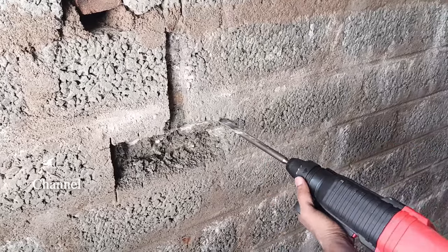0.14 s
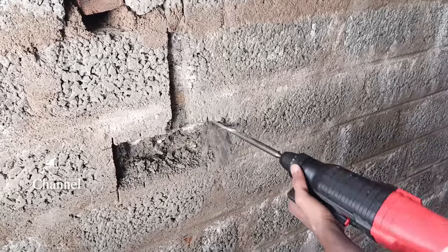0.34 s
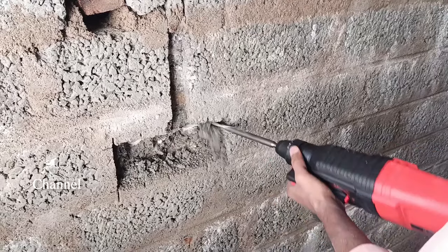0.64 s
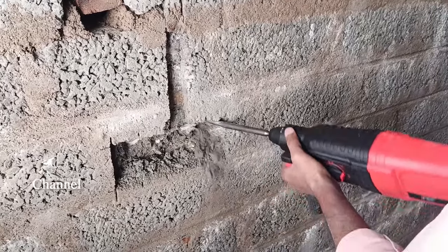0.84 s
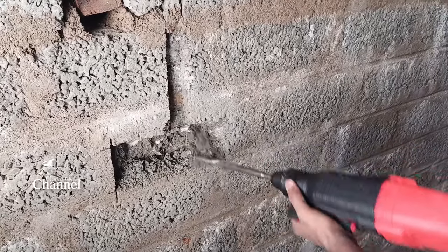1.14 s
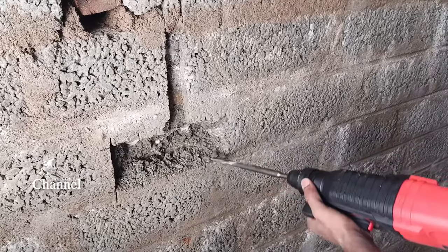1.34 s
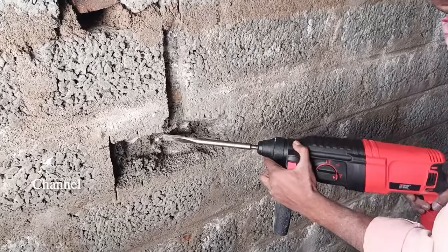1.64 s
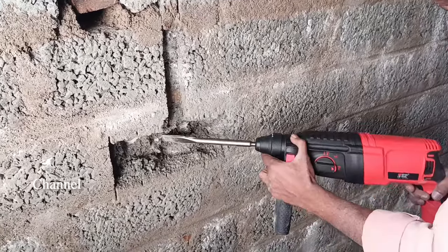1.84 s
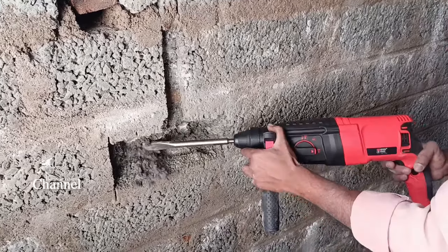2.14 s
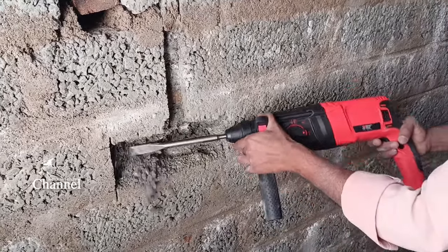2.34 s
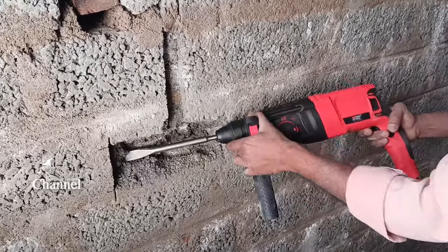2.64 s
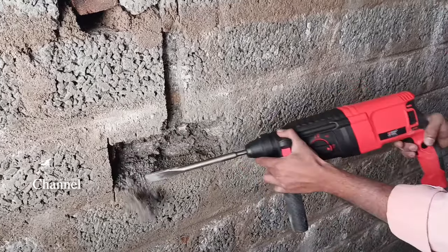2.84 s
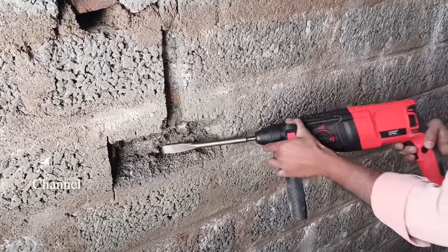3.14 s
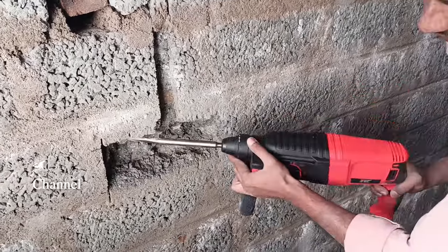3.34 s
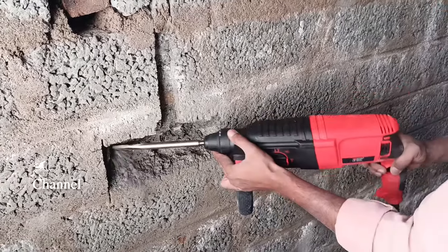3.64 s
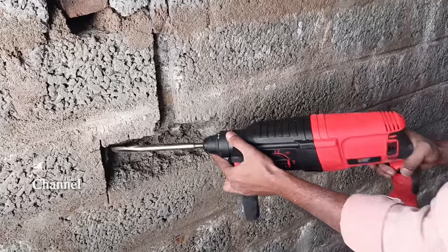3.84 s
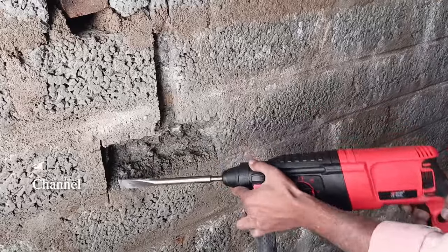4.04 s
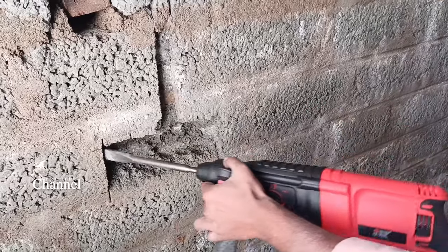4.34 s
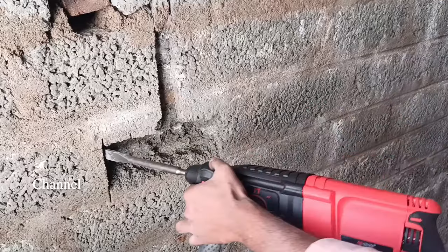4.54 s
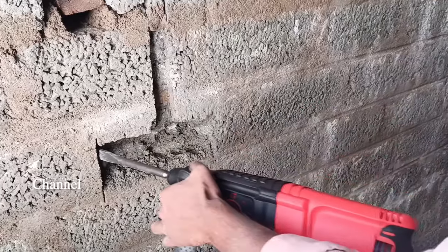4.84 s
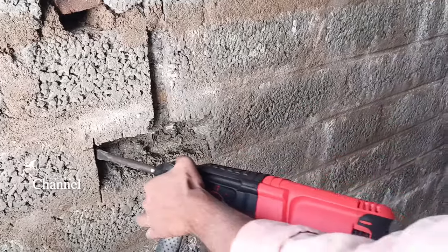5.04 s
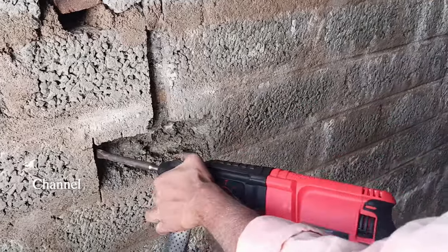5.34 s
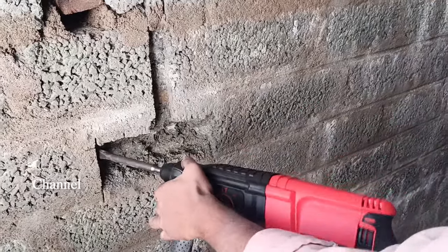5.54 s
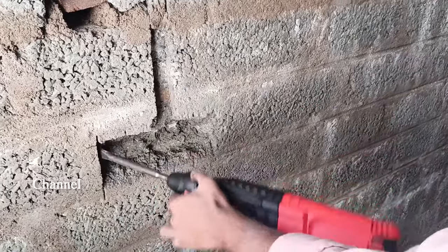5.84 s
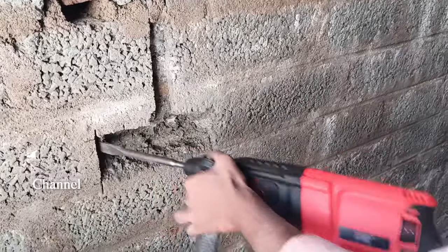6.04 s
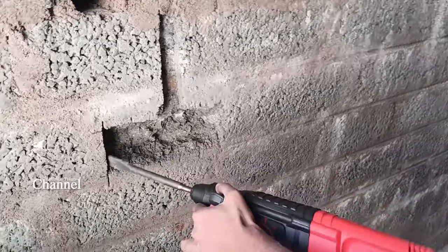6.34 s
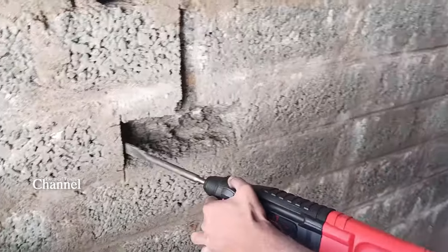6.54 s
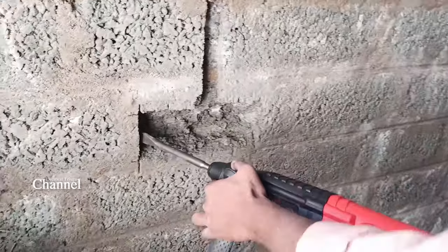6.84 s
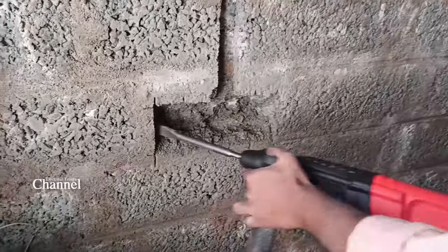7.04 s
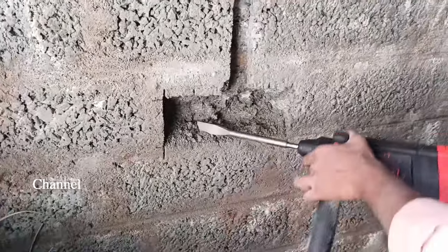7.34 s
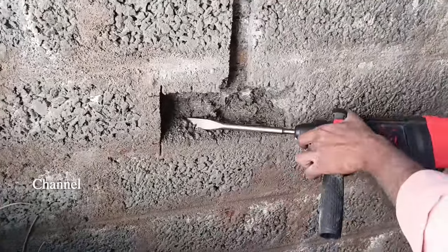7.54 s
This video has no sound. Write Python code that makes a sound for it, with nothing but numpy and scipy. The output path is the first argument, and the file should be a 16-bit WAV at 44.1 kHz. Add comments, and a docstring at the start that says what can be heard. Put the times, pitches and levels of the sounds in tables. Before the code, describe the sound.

Close, harsh power-chisel chatter on a block wall: whirring gears, crunching grit and hollow booms, with two abrupt cuts and several run-downs.

```python
"""A rotary hammer chips a concrete block wall, heard from close by in three stretches of work.
Its piston strikes about 65 times a second; each blow shakes gear noise and ringing out of the housing.
When the chisel bites, bursts of noise crack like grit, and tuned resonances ring as steel, block and wall.
Lumps of low noise buffet the two microphone ports as puffs of air and dust. Narrow pitches stand out at
moments, short bright taps come from the chisel, and a rough tone climbs briefly after each of two cuts."""
import sys
import numpy as np
from scipy import signal
from scipy.fft import rfft, irfft, next_fast_len
from scipy.io import wavfile
from scipy.ndimage import uniform_filter1d

SR = 44100
rng = np.random.default_rng(int(sys.argv[2]) if len(sys.argv) > 2 else 0)


def output_pcm(signal):
    """Save a mono or channel-first signal as 16-bit PCM at the path in sys.argv[1].

    Samples are clipped to [-1, 1] before scaling.
    """
    pcm = np.clip(np.atleast_2d(signal).T, -1, 1) * 32767
    wavfile.write(sys.argv[1], SR, np.round(pcm).astype(np.int16))


N = 339570  # length in samples

# Tone colour of the gear noise: pitch_hz, level_db (per Hz, relative)
HOUSING_COLOUR = [(150, -41.5), (500, -23.5), (760, -13), (1300, -5.5), (2580, 0.5), (3260, -2.5),
                  (4370, -0.5), (6000, -7), (8200, -18), (9600, -13), (13000, -31.5), (15500, -19.5)]
# Resonances of the housing shell: pitch_hz, level_db (relative)
SHELL_MODES = [(1320, -5), (1620, -3), (1900, -1.5), (2090, 1), (2350, -3), (2570, 1.5), (2750, -1),
               (3600, -2.5), (3950, 1), (4400, 0), (4800, -21), (5250, -8)]
# Resonances of the steel chisel: pitch_hz, level_db (relative)
CHISEL_MODES = [(9360, -3), (10070, -9), (12800, -12), (13040, 0), (13260, -7)]
# Resonances of the concrete block: pitch_hz, level_db (relative)
BLOCK_MODES = [(630, 13.5), (706, 22.5), (789, 21), (948, 13), (1190, 15)]
# Low resonances of the wall: pitch_hz, level_db (relative)
WALL_MODES = [(125, -17), (200, -11.5), (250, -6.5), (335, -11.5), (480, -9)]
# Tone colour of the cracking grit: pitch_hz, level_db (per Hz, relative)
GRIT_COLOUR = [(70, -40), (150, -5.5), (1500, -3), (4000, -1.5), (6500, 2), (8300, -11.5), (10000, 0.5),
               (11700, -8), (13500, -3), (15500, 7)]
# Tilt between the ports, used in part on the left and reversed on the right: pitch_hz, tilt_db
PORT_TILT = [(60, -7), (130, 3.5), (290, 0), (640, 4), (1410, 11), (3100, 2.5), (6820, -0.5), (15000, -1)]
# Puffs of air on the microphone ports: start_s, level_db (relative)
PUFFS = [(1.089, -26.5), (1.135, -36.5), (1.98, -28), (2.05, -26), (2.095, -27), (2.155, -33), (2.205, -32),
         (2.256, -28), (2.45, -30.5), (2.555, -40), (2.686, -33.5), (3.553, -42), (3.605, -29),
         (3.751, -27), (3.83, -39), (3.871, -28.5), (3.905, -26.5), (4.91, -37), (6.921, -42)]
# Moments when one narrow pitch stands out, a ringing resonance, a blow harmonic or a knock:
# start_s, length_s, pitch_hz, level_db
NARROW_PITCHES = [(0.003, 0.34, 2000, -36), (0.23, 0.12, 139, -48.5), (0.317, 0.2, 5780, -25.5),
                  (0.44, 0.34, 119, -50), (0.47, 0.32, 183, -45), (0.504, 0.36, 5780, -25.5),
                  (0.799, 0.34, 5730, -26.5), (0.56, 0.41, 790, -41), (0.82, 0.37, 787, -29.5),
                  (0.94, 0.13, 1185, -31), (1.057, 0.13, 7110, -26), (1.17, 0.28, 2618, -19),
                  (1.83, 0.12, 787, -37.5), (2.72, 0.13, 4430, -24), (2.786, 0.099, 5730, -26),
                  (3.247, 0.042, 280, -34), (3.332, 0.2, 3700, -23.5), (3.35, 0.092, 1010, -48),
                  (3.41, 0.066, 780, -46), (3.39, 0.15, 5440, -25), (3.533, 0.5, 5650, -27.5),
                  (3.951, 0.15, 265, -42.5), (4.664, 0.079, 1180, -31), (4.664, 0.18, 1890, -28.5),
                  (4.695, 0.1, 3910, -25), (4.718, 0.12, 5240, -27), (4.673, 0.13, 2630, -26.5),
                  (5.13, 0.27, 1175, -32.5), (5.34, 0.12, 901.5, -26.5), (5.946, 0.24, 4370, -23.5),
                  (5.998, 0.26, 2515, -25), (6, 0.15, 226, -42), (6.93, 0.055, 807, -25),
                  (7.044, 0.22, 224, -45), (7.047, 0.49, 722, -36.5), (7.117, 0.13, 5250, -26),
                  (7.05, 0.16, 4030, -26.5), (7.092, 0.35, 2380, -28)]
# Cuts: the sound is cut off and the next stretch begins, the tool already running: cut_s
CUTS_S = [1.603, 3.275]
# The trigger is held: start_s, end_s, sag_per_s (target speed lost at full load, in blows per s)
TRIGGER_PULLS = [(0, 1.35, 25), (1.62, 2.88, 17), (3.28, 3.93, 16), (4.61, 5.6, 19), (5.8, 6.13, 0),
                 (6.6, 7.27, 8)]
# The chisel bites: start_s, end_s, then level lists spread evenly over the bite:
# grit_db, steel_db, block_boom_db, wall_thud_db, housing_change_db (below 0 is damped)
BITES = [(0.27, 1.171, (-17, -22.5, -27, -24), (-29, -29, -30.5, -26, -27), (-56, -25, -34, -29),
         (-58, -43, -42, -46), (-0.5, -4.5, -1, 0.5)), (1.881, 2.758, (-16.5, -13, -13, -28),
         (-31, -30, -32, -61), (-31.5, -37, -22.5, -29), (-53, -50, -47, -48), (4.5, -1, 0, -1, -1, -8.5)),
         (3.504, 3.976, (-27, -22, -9), (-23, -28.5, -26.5), (-59, -27, -36), (-50, -36, -40),
         (-1.5, -0.57, 4.2)), (4.499, 4.676, (-46, -38, -47), (-62,), (-72,), (-79,), (-3,)),
         (4.762, 5.489, (-25.5, -13, -23, -27), (-34, -36, -35, -44), (-48, -34, -46, -27),
         (-38, -59, -40, -38.5), (-3.5, 3.5, -0.1, 2)), (6.744, 6.861, (-15, -31), (-60,), (-59, -42),
         (-39, -71), (-0.78, -9)), (6.871, 7.061, (-13.5, -31.5), (-58,), (-25.5, -20.5), (-41, -49),
         (-1.7, -1.3))]
# Short bright taps of the chisel as it slows and as it picks up speed again:
# start_s, level_db (relative)
TAPS = [(4.529, -43), (4.561, -37.5), (4.593, -44), (4.789, -37), (4.806, -40), (4.82, -35), (4.834, -29)]
# Resonances of the steel in each tap: pitch_hz, level_db (relative)
TAP_MODES = [(10400, -0.5), (11710, -7), (14900, 1), (7260, -5)]

# Motor speed in blows per second; spin-up and coasting times in seconds
START_PER_S, FREE_PER_S, SPIN_UP_S, COAST_S = 54, 78, 0.18, 0.87
REFERENCE_PER_S = 66
LOAD_EASES = 0.66  # share of the load gone by the end of a bite
HOUSING_DB, DB_PER_BLOW_PER_S = -24.5, 0.0556  # level at reference speed; louder when faster
LOOSE_REST, BITING_REST = 0.9, 1.6  # gear noise between strokes: clearer gaps with a loose chisel
SHELL_WIDTH_HZ, PATCHY_DB = 60, 3.4  # width of shell resonances; largest swing of each noise band
IDLE_BOOM_DB, IDLE_THUD_DB = -42.5, -59  # what block and wall pick up, at reference speed
LOOSE_WIDTH, BITING_WIDTH = 0.04, 0.03  # width of a narrow pitch as its share, before 25 Hz is added
BITE_IN_S, BITE_OUT_S, EDGE_DB = 0.08, 0.044, 16  # each bite swells and fades by EDGE_DB
BITE_SPREAD_DB = 4  # extra unevenness of the blows that ring the chisel steel and crack the grit
PUFF_S, PUFF_PAN_DB = 0.019, -2.5  # time scale of a puff; left minus right
RUMBLE_DB = -30.5  # dust stream on the ports, relative to the grit's level
REFILL_DB, REFILL_S = 9.5, 0.074  # quieter start after a cut; recovery time
CYCLES_PER_BLOW, CLIMB_DB = 8.1, -35  # pitch of the climbing tone; its level setting
TAP_DECAY_S, TAP_WIDTH_HZ = 0.0034, 310
LEFT_LAG_S = 0.000862
CUTOFF_HZ = 16100


def from_db(db):
    """Turn decibels into a multiplier."""
    return 10 ** (np.asarray(db) / 20)


def rms_one(x):
    """Scale a sound to an average strength of one."""
    return x / np.sqrt(np.mean(x ** 2) + 1e-20)


def in_time(values, step_s):
    """Stretch evenly spaced values over every sample."""
    return np.interp(np.arange(N) / SR, step_s * np.arange(len(values)), values)


def colour(x, points, factor=1):
    """Change the tone with a dB curve over pitch, spaced as the ear hears it."""
    size = next_fast_len(N + 8192)
    hz, db = np.transpose(points)
    bins_hz = np.arange(size // 2 + 1) * SR / size
    curve_db = np.interp(np.log(bins_hz + 1), np.log(hz), db)
    return irfft(rfft(x, size) * from_db(factor * curve_db), size)[..., :N]


def drift(rate_hz):
    """Slow random wandering around zero with a spread of one."""
    r = np.exp(-80 * np.pi * rate_hz / SR)  # one value per 40 samples
    noise = rng.standard_normal(N // 40 + 2002)
    slow = signal.lfilter([1], [1, -2 * r, r * r], noise)[2000:]
    return np.interp(np.arange(N) / 40, np.arange(len(slow)), rms_one(slow))


def stereo_noise(alike, size=N):
    """White noise, a share of it common to both ports."""
    common, left, right = rng.standard_normal((3, size))
    alike = np.clip(alike, 0, 1)
    return np.sqrt(alike) * common + np.sqrt(1 - alike) * np.array([left, right])


def resonate(x, hz, width_hz):
    """Let one pitch ring; a narrow width rings longer."""
    r = np.exp(-np.pi * width_hz / SR)
    return signal.lfilter([1, 0, -1], [1, -2 * r * np.cos(2 * np.pi * hz / SR), r * r], x + 1e-18)


def motor(step_s=0.005):
    """Speed spins up under power, sags while the chisel bites and coasts down off the trigger."""
    speed = [START_PER_S]
    for s in np.arange(0, N / SR, step_s):
        load = sum(1 - LOAD_EASES * (s - start) / (end - start)
                   for start, end, *levels in BITES if start + BITE_IN_S < s < end)
        goals = [FREE_PER_S - sag * load for on, off, sag in TRIGGER_PULLS if on <= s < off]
        pull = (goals[0] - speed[-1]) / SPIN_UP_S if goals else -speed[-1] / COAST_S
        # each later stretch begins at the starting speed
        new_stretch = any(0 <= s - cut < step_s for cut in CUTS_S)
        speed.append(START_PER_S if new_stretch else speed[-1] + step_s * pull)
    return in_time(speed, step_s)


def blows(per_s, jitter_s, spread_db):
    """Sample index and strength of each piston blow; slow blows are weaker."""
    at = np.flatnonzero(np.diff(np.floor(np.cumsum(per_s) / SR)))
    chance = rng.standard_normal((len(at), 2))
    shift = (chance[:, 0] * jitter_s * SR).astype(int)
    strength = per_s[at] / REFERENCE_PER_S * from_db(spread_db * chance[:, 1])
    return np.clip(at + shift, 0, N - 1), strength


def after_blows(at, strength, decay_s, rest, rise_s):
    """Loudness that swells at each blow and dies away to a resting level."""
    clicks = np.zeros(N)
    clicks[at] = strength
    rise = np.exp(-1 / (rise_s * SR))
    fall = np.exp(-1 / (decay_s * SR))
    return rest + signal.lfilter([1 - rise], np.convolve([1, -rise], [1, -fall]), clicks)


def strokes(at, strength, cluster_s, alike):
    """A stroke is a cluster of contacts repeated at every blow; three patterns blend slowly."""
    clicks, out = np.zeros((1, N)), 0
    clicks[0, at] = strength
    window = np.exp(-0.5 * (np.arange(-400, 400) / (cluster_s * SR)) ** 2)
    blend = np.array([drift(2.67) for k in range(3)])
    for share in blend / np.linalg.norm(blend, axis=0):
        pattern = window * stereo_noise(alike, size=800)
        out = out + share * signal.oaconvolve(clicks, pattern, axes=1)[:, 400:N + 400]
    return rms_one(out)


def struck(modes, push, width_hz, wander_db, waver_s=0):
    """The push rings every resonance; the grip slowly shifts levels and, with waver_s, pitches."""
    out = 0
    for hz, level_db in modes:
        # the second pass steepens the sides of the resonance
        ring = rms_one(resonate(resonate(push, hz, width_hz), hz, 3 * width_hz))
        read = np.arange(N) + waver_s * SR * drift(4.0)
        gain = from_db(level_db + wander_db * np.tanh(drift(6.3)))
        out = out + gain * [np.interp(read, np.arange(N), side) for side in ring]
    return rms_one(out)


def housing(at, strength, push, per_s, depth):
    """Gear and brush noise swells with strokes, patchy by band, brighter at speed; the shell rings."""
    rest_level = LOOSE_REST + (BITING_REST - LOOSE_REST) * depth
    swell = after_blows(at, strength, 0.0035, rest_level, 0.001)
    swell = swell / uniform_filter1d(swell, size=3000)  # strokes change the grain, not the level
    rattle = rms_one(colour(stereo_noise(0.0076) * swell + 0.095 * push, HOUSING_COLOUR))
    pace = per_s / REFERENCE_PER_S
    out, rest = 0, rattle
    for band, edge_hz in enumerate([1100, 2000, 3300, 5500]):
        low = signal.sosfiltfilt(signal.butter(2, edge_hz, fs=SR, output="sos"), rest)
        patchy = from_db(PATCHY_DB * np.tanh(drift(7.3)))
        out = out + low * patchy * pace ** (0.5 * band)
        rest = rest - low
    shell = struck(SHELL_MODES, push, SHELL_WIDTH_HZ, wander_db=8.0, waver_s=0.0003)
    return out + rest * pace ** 0.68 + from_db(-3.5) * shell


def concrete_block(at, strength):
    """Very short blows and some noise make the block's middle resonances boom."""
    push = strokes(at, strength, 0.00031, 1.0) + 0.5 * stereo_noise(0.54)
    return struck(BLOCK_MODES, push, 66, wander_db=5.5, waver_s=0.00057)


def wall_thud(at, strength):
    """Bare blows ring the wall's low resonances and give clear harmonics."""
    clicks = np.zeros(N)
    clicks[at] = strength
    return struck(WALL_MODES, clicks + 0.03 * stereo_noise(0.6), 45, wander_db=4)


def narrow_pitches(push, depth):
    """One narrow pitch swells and fades; it is wider when higher, narrower while the chisel bites."""
    out = np.zeros((2, N))
    for s, length_s, hz, level_db in NARROW_PITCHES:
        i, n = int(s * SR), int(length_s * SR)
        width_share = LOOSE_WIDTH + (BITING_WIDTH - LOOSE_WIDTH) * depth[i + n // 2]
        width_hz = width_share * hz + 25
        drive = push[:, i:i + n] + 0.5 * stereo_noise(0.4, size=n)
        ring = resonate(resonate(drive, hz, width_hz), hz, 2 * width_hz)
        out[:, i:i + n] += from_db(level_db) * rms_one(ring) * signal.windows.tukey(n, 0.7)
    return out


def bites():
    """Gains of grit, steel, block and wall; housing change in dB; how far the chisel is in, 0-1."""
    t, gains, housing_change_db, depth = np.arange(N) / SR, np.zeros((4, N)), np.zeros(N), np.zeros(N)
    for start, end, *layers in BITES:
        i = slice(int(start * SR), int(end * SR))
        going_in = np.clip((t[i] - start) / BITE_IN_S, 0, 1)
        coming_out = np.clip((end - t[i]) / BITE_OUT_S, 0, 1)
        depth[i] = np.minimum(going_in, coming_out)
        *levels, change_db = [np.interp(t[i], np.linspace(start, end, len(db)), db) for db in layers]
        gains[:, i] += from_db(np.array(levels) - EDGE_DB * (1 - depth[i]))
        housing_change_db[i] += change_db * depth[i]
    return gains, housing_change_db, depth


def chisel_steel(at, landed):
    """Uneven blows and some noise make the high resonances of the steel ring."""
    push = strokes(at, landed, 0.0008, 0.4) + 0.5 * stereo_noise(0.4)
    return struck(CHISEL_MODES, push, 90, wander_db=5)


def grit(at, landed):
    """Grains of uneven size crack off, loudest just after a blow."""
    sizes = from_db(3.4 * np.minimum(rng.exponential(1, N), 5))
    swell = after_blows(at, landed, 0.00078, 0.23, 0.00048)
    return rms_one(colour(sizes * stereo_noise(0.2) * swell, GRIT_COLOUR))


def buffeting(cracking):
    """Puffs are lumps of low noise, nearly separate at each port; a lighter rush runs under the grit."""
    swell, age = np.zeros(N), np.arange(4000) / SR / PUFF_S
    for s, level_db in PUFFS:
        i = int(s * SR)
        swell[i:i + 4000] += from_db(level_db) * age * np.exp(1 - age ** 2)
    noise = stereo_noise(0.021)
    lows = rms_one(signal.sosfilt(signal.butter(2, [75, 200], "band", fs=SR, output="sos"), noise))
    air = rms_one(signal.sosfilt(signal.butter(2, [140, 560], "band", fs=SR, output="sos"), noise))
    pan = from_db([[PUFF_PAN_DB / 2], [-PUFF_PAN_DB / 2]])
    return pan * (swell * (lows + 0.69 * air) + from_db(RUMBLE_DB) * cracking * air)


def cuts():
    """Sound drops to silence at each cut and fills up again within a few hundredths of a second."""
    gain = 1
    for s in CUTS_S:
        age = np.maximum(np.arange(N) / SR - s, 0)
        gap = 1 - np.exp(-(age / 0.012) ** 2)
        recovery = from_db(-REFILL_DB * np.exp(-(age / REFILL_S) ** 2))
        gain = gain * np.where(age > 0, gap * recovery, 1)
    return gain


def climbing_tone(per_s):
    """A rough tone and its octave climb briefly as the sound comes back after each cut."""
    phase = 2 * np.pi * np.cumsum(CYCLES_PER_BLOW * per_s) / SR
    swell = sum(np.exp(-((np.arange(N) / SR - s - 0.19) / 0.07) ** 2) for s in CUTS_S)
    tones = 0.5 * np.sin(phase) + np.sin(2 * phase)
    return from_db(CLIMB_DB) * swell * drift(40.0) * tones


def taps():
    """Each tap is a short bright burst in the steel."""
    out, age = np.zeros((2, N)), np.arange(900) / SR
    for s, level_db in TAPS:
        i = int(s * SR)
        burst = stereo_noise(0.58, size=900) * np.exp(-age / TAP_DECAY_S)
        ring = sum(from_db(db) * rms_one(resonate(burst, hz, TAP_WIDTH_HZ)) for hz, db in TAP_MODES)
        out[:, i:i + 900] += from_db(level_db) * ring
    return out


def scene():
    """Layers of tool, block and wall are mixed, reach the two ports and meet the puffs there."""
    per_s = motor()
    (cracking, ringing, boom, thud), housing_change_db, depth = bites()
    pace_db = DB_PER_BLOW_PER_S * (per_s - REFERENCE_PER_S)
    at, strength = blows(per_s, jitter_s=0.0001, spread_db=1.2)
    landed = strength * from_db(BITE_SPREAD_DB * rng.standard_normal(len(at)))
    push = strokes(at, strength, 0.0013, 0.3) + (0.6 + 0.2 * depth) * stereo_noise(0.15)

    housing_gain = from_db(HOUSING_DB + pace_db + housing_change_db)
    mix = housing_gain * housing(at, strength, push, per_s, depth)
    mix = mix + (boom + from_db(IDLE_BOOM_DB + pace_db)) * concrete_block(at, strength)
    mix = mix + (thud + from_db(IDLE_THUD_DB + pace_db)) * wall_thud(at, strength)
    mix = mix + narrow_pitches(push, depth)
    mix = mix + ringing * chisel_steel(at, landed)
    mix = mix + from_db(3.3 * drift(9.6)) * cracking * grit(at, landed)
    left, right = mix + climbing_tone(per_s) + taps()

    left = np.interp(np.arange(N) - LEFT_LAG_S * SR, np.arange(N), left)  # the far port hears later
    at_ports = np.array([colour(left, PORT_TILT, 0.52), colour(right, PORT_TILT, -0.77)])
    return cuts() * (at_ports + buffeting(cracking))


def record(dry):
    """The microphone drops the deep bass and rounds the peaks; the top is cut."""
    dry = signal.sosfilt(signal.butter(2, 65, "high", fs=SR, output="sos"), dry)
    dry = 0.8 * np.tanh(dry / 0.8)
    return signal.sosfilt(signal.cheby2(24, 90, CUTOFF_HZ, fs=SR, output="sos"), dry)


dry = scene()
out = record(dry)
output_pcm(out)
```